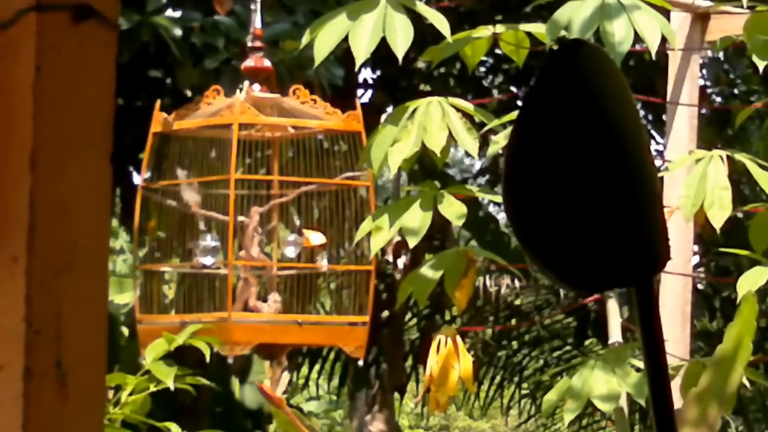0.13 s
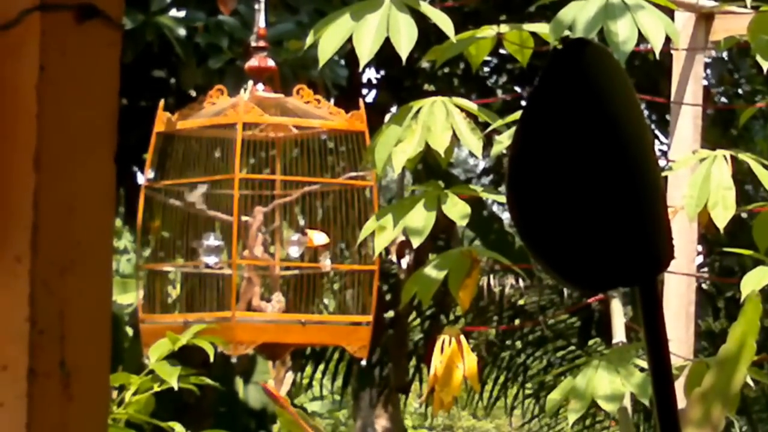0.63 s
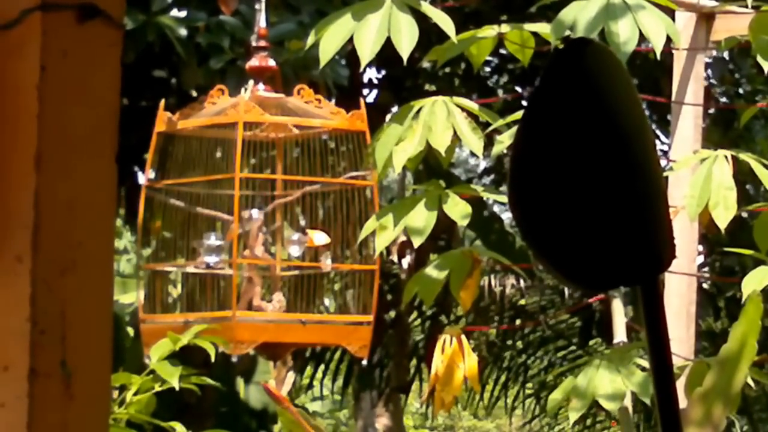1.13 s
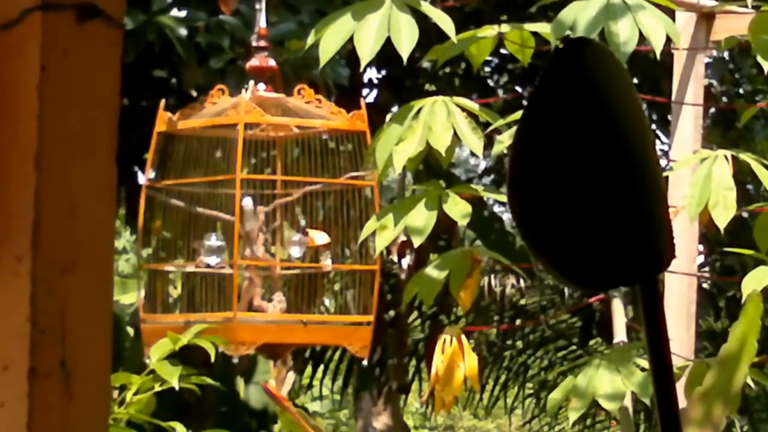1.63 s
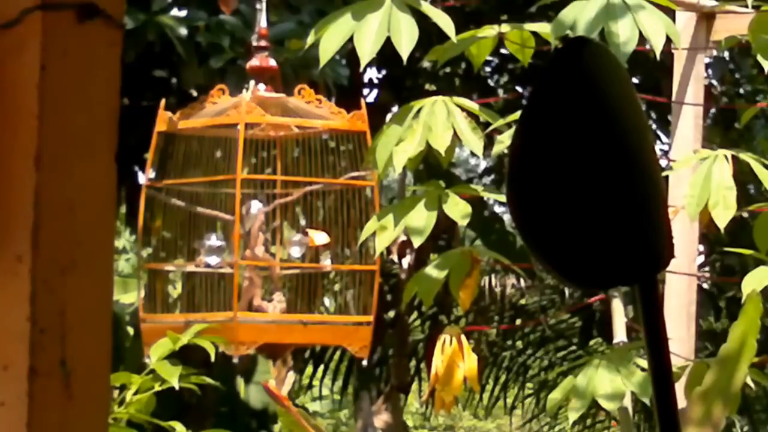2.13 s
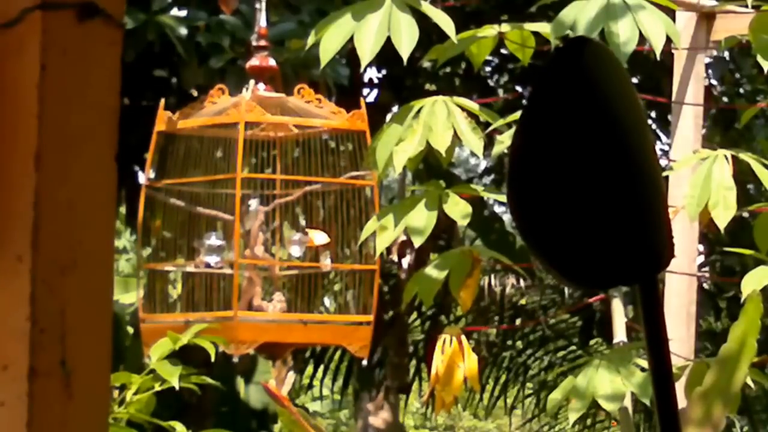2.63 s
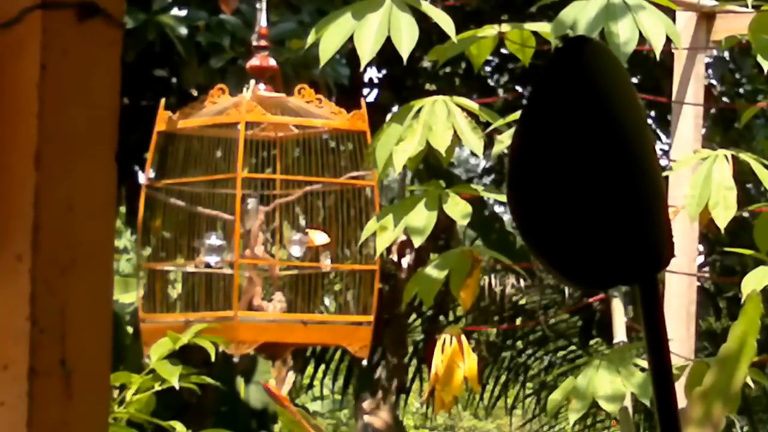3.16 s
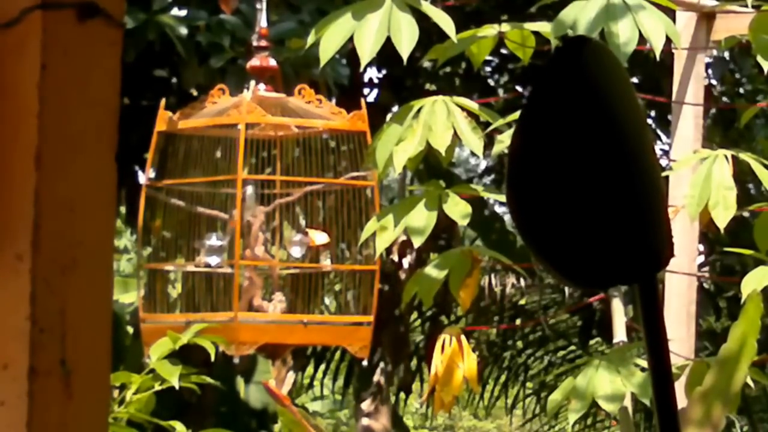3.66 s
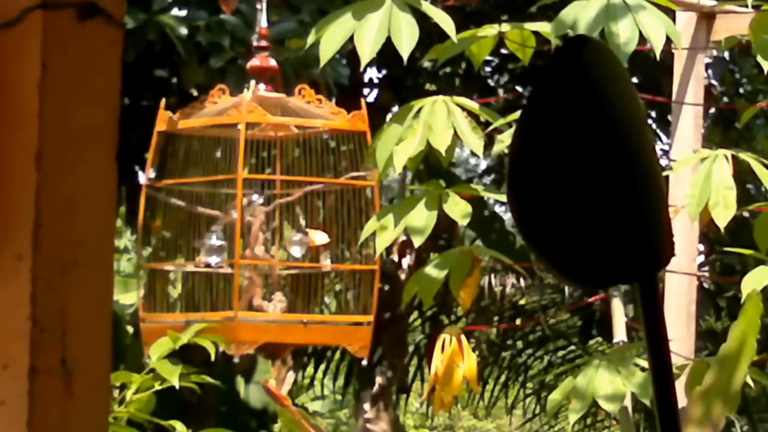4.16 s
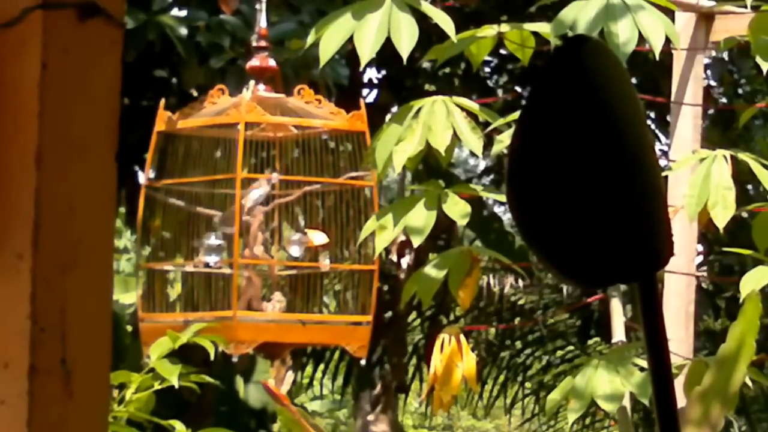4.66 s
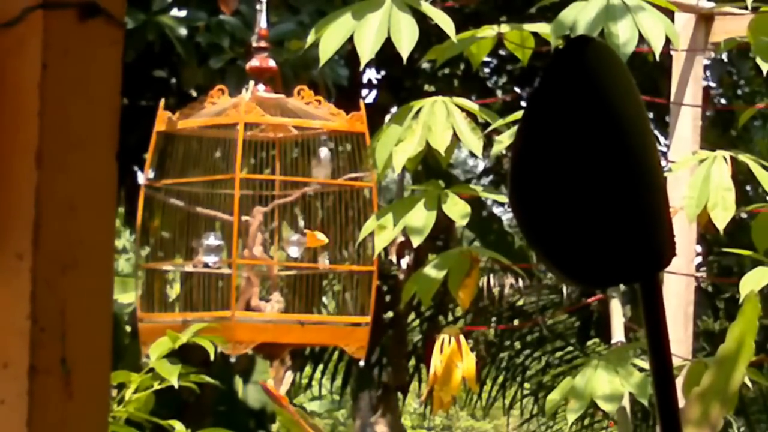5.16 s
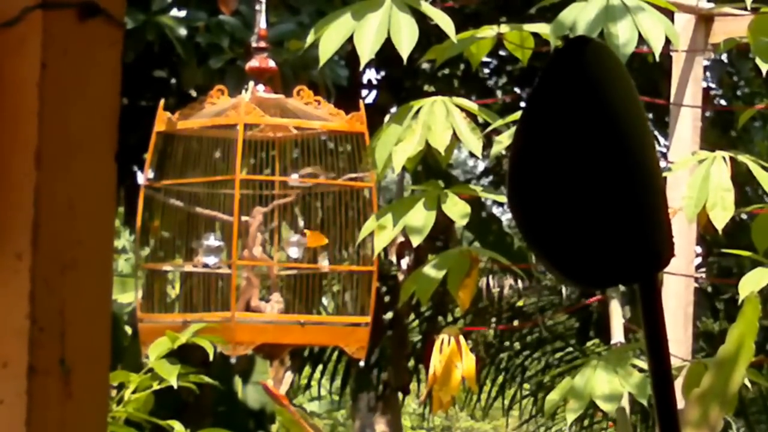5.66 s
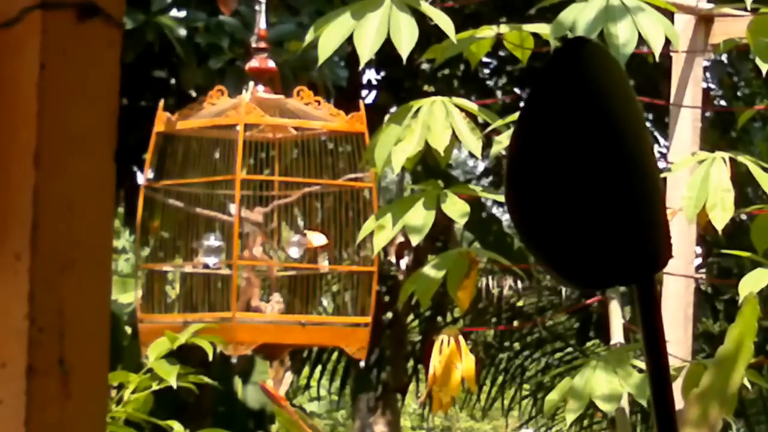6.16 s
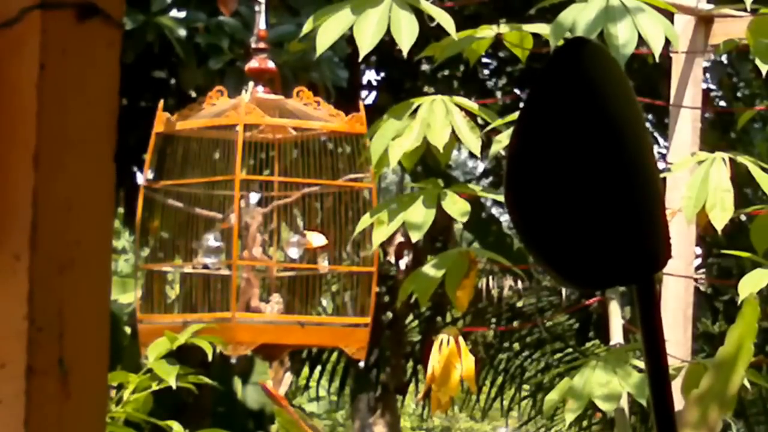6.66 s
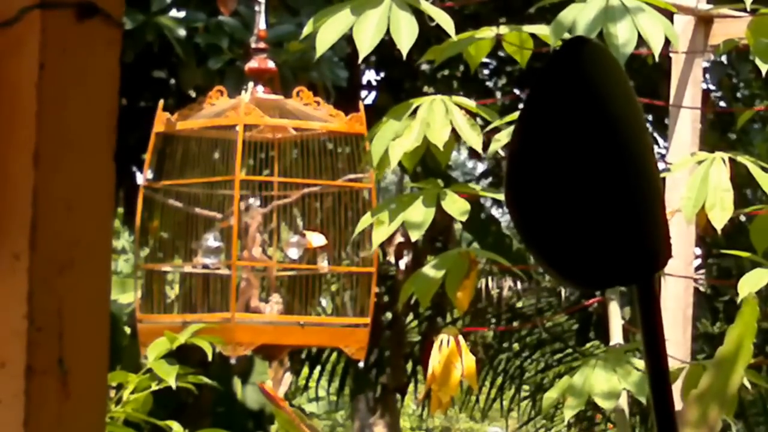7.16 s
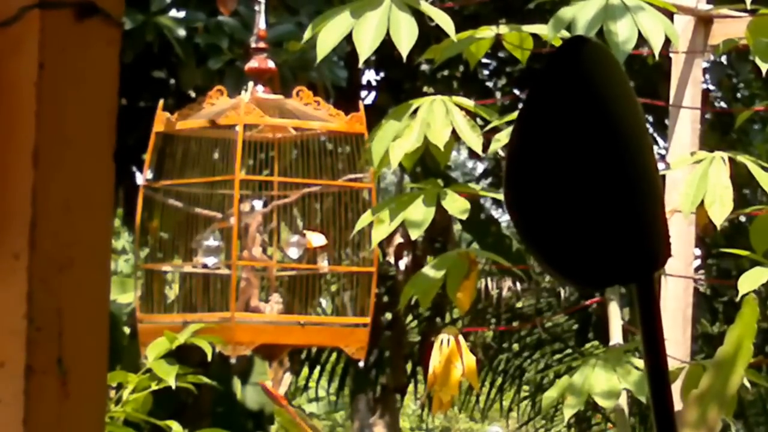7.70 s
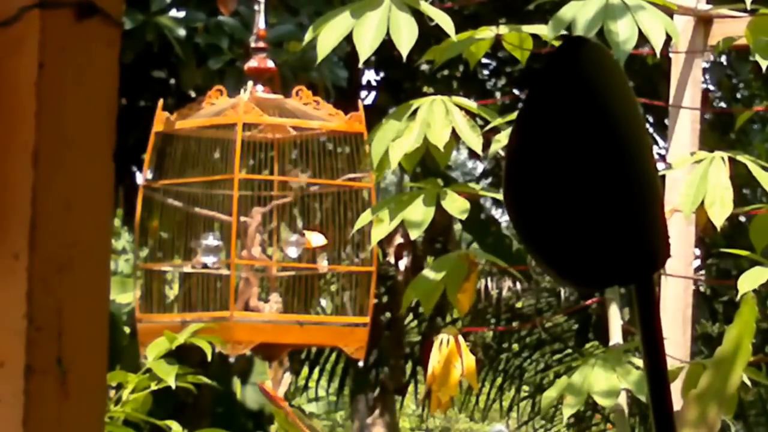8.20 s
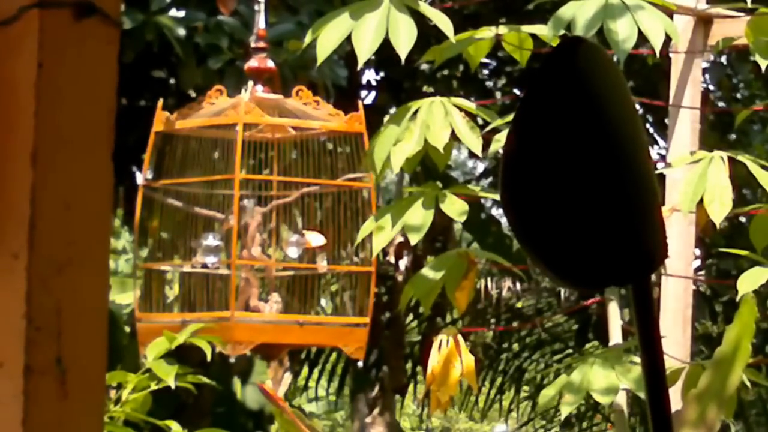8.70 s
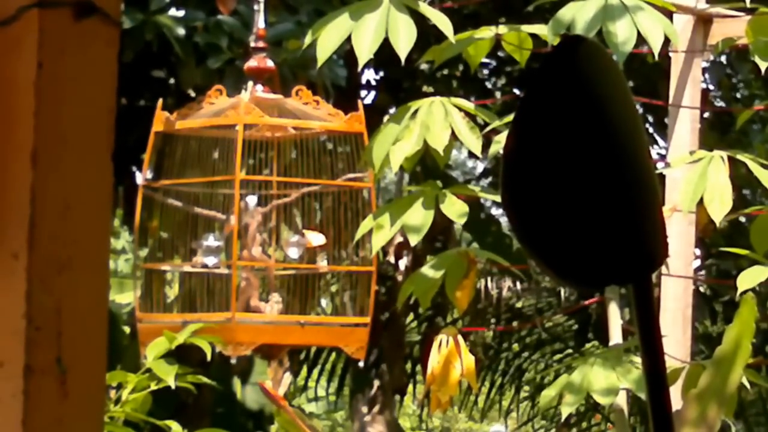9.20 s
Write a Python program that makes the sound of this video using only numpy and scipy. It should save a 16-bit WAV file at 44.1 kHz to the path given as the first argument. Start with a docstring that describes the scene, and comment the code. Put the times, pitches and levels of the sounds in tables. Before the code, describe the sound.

Bright, clicking bird chips open the scene and return five times, each a rapid rise and fall with a brief leafy echo. Quick whistled notes bend and slur between them, while distant birds answer faintly. Behind is a quiet garden bed of low rumble and high insect hiss. A soft double thump with a rustle precedes a far vehicle's tyre rush and engine growl, then calm returns. Mono pickup at moderate distance.

```python
"""Garden songbirds by day

Sharp high chips and short gliding whistles, near and far: sine tones along pitch and level tracks,
smeared by decaying noise echoes off walls and trees. Behind them, filtered noise: low traffic rumble,
tyres and engine of a vehicle passing in the distance, a high band of insect hiss.
A double thump is two pairs of decaying low sines; two brief rustles are gated broad noise."""
import sys
import numpy as np
from scipy import signal
from scipy.fft import rfft, irfft
from scipy.io import wavfile
from scipy.ndimage import uniform_filter1d, map_coordinates

SR = 44100
rng = np.random.default_rng(int(sys.argv[2]) if len(sys.argv) > 2 else 0)


def how_loud(loudness_db):
    """Turn decibels into a plain amplitude multiplier (0 dB gives 1, 20 dB gives 10)."""
    steps = np.asarray(loudness_db, float) / 20
    return 10 ** steps


def dump_mix(stems):
    """Bounce the given channels to the path in sys.argv[1] as a 16-bit WAV at rate SR."""
    frames = np.atleast_2d(stems).T  # one column per channel
    limited = np.clip(frames, -1, 1)  # hard clip at full scale
    pcm = np.round(limited * 32767).astype(np.int16)
    wavfile.write(sys.argv[1], SR, pcm)


N = 411012

# far birds' whistles and lingering echo tails: [t/s, length/s, start f/Hz, end f/Hz, start level/dB]
FAR_GLIDES = [(-.04, 0.069, 2350, 2035, -54), (0.758, 0.0696, 3460, 3607, -60),
              (0.824, 0.16, 2234, 2265, -54.5), (0.865, 0.0646, 2896, 3311, -47.5),
              (0.887, 0.106, 2595, 2610, -54.5), (1.074, 0.0478, 1709, 1878, -50),
              (1.093, 0.0986, 2204, 2385, -41.5), (1.126, 0.0456, 3511, 3101, -33),
              (1.135, 0.0827, 2697, 2781, -40), (1.26, 0.262, 2350, 2335, -53),
              (1.391, 0.0421, 3210, 3188, -47.5), (3.572, 0.0783, 2940, 2539, -48.5),
              (4.066, 0.0397, 2525, 2796, -42), (4.093, 0.1056, 3113, 3060, -50),
              (4.13, 0.018, 1870, 1824, -41), (4.234, 0.0496, 2951, 2835, -48.5),
              (3.878, 0.086, 3400, 3523, -48), (4.263, 0.0812, 2079, 2037, -43.5),
              (4.457, 0.091, 2074, 2076, -42), (4.593, 0.135, 2069, 2033, -52),
              (5.461, 0.0183, 1807, 2050, -46.5), (6.834, 0.082, 2350, 3538, -49.5),
              (7.03, 0.0956, 3279, 2971, -49), (7.164, 0.117, 2053, 2053, -55),
              (7.241, 0.0717, 2769, 2574, -50), (8.273, 0.135, 3421, 3211, -62),
              (8.476, 0.146, 3534, 3129, -60), (8.526, 0.0603, 1410, 1841, -50.5),
              (9.14, 0.127, 3380, 3432, -65.5)]
# pitch and level track of one chip: [t after onset/s, nominal f/Hz, level re chip level/dB]
CHIP_TRACK = [(0, 3547, -33.5), (.009, 7320, -6.5), (0.016, 7500, -11), (0.028, 7642, -3.5),
              (0.046, 7040, -9.5), (0.072, 6365, -12), (0.087, 6275, -49)]
# chip onsets: [t/s, chip level/dB]
CHIP_ONSETS = [(-.021, -6.5), (1.111, -7), (2.966, -7), (4.585, -7.5), (6.776, -7.5), (9.063, -7.5)]
# broad hiss in near notes and at chip onsets: [f/Hz, relative level/dB]
HISS_SPECTRUM = [(2500, -25), (3800, -17), (8500, -1.5), (11000, -27), (14500, -11.5)]
# echo filter, leaves scatter low notes back less: [f/Hz, gain/dB]
FOLIAGE_FILTER = [(1800, -2.5), (3000, 0)]
# low traffic rumble: [f/Hz, relative level/dB]
RUMBLE_SPECTRUM = [(22, 1), (34, 4.5), (105, 4), (135, -13), (330, -14.5), (500, -27.5), (2200, -31),
                   (3500, -67)]
# tyre rush: [f/Hz, relative level/dB]
TYRE_SPECTRUM = [(250, -5.5), (400, -9), (1290, -2), (2000, -11), (4000, -21), (6000, -23), (11000, -81.5)]
# engine drone: [f/Hz, relative level/dB]
DRONE_SPECTRUM = [(130, -17), (200, -1), (270, 0), (450, -50.5)]
# passing vehicle: [t/s, tyre level/dB, drone level/dB]
TRAFFIC_LEVELS = [(0, -60.5, -52.5), (1.4, -51.5, -55), (1.7, -47.5, -47.5), (3.35, -48.5, -53),
                  (3.55, -42, -45), (4.5, -35.5, -49.5), (4.85, -43, -48.5), (5.6, -38.5, -39),
                  (6.7, -45, -40.5), (7, -48.5, -48.5), (7.8, -51, -43.5), (9.32, -56, -51.5)]
# insects and leaves: [f/Hz, relative level/dB]
INSECT_SPECTRUM = [(4000, -67), (5200, -31), (6300, -18), (7300, 2), (8400, -18.5), (11000, -32),
                   (11800, -72.5), (13200, -49), (14000, -15.5), (15600, -26)]
# near bird's bent notes, before tone filter: [t/s, length/s, start f/Hz, bend f/Hz, end f/Hz, peak level/dB]
BENT_NOTES = [(1.525, 0.094, 1583, 2464, 1915, -36.5), (2.107, 0.078, 1604, 2694, 2892, -29),
              (2.323, 0.0533, 1900, 2444, 2186, -33), (2.78, 0.0477, 2350, 2464, 2462, -31.5),
              (2.94, 0.066, 1518, 2835, 3706, -26), (5.209, 0.0648, 2200, 3136, 3242, -29.5),
              (5.485, .11, 3200, 2543, 2941, -28), (2.704, 0.0445, 3300, 3620, 2980, -28),
              (5.902, 0.0455, 2900, 2924, 2956, -28), (7.35, 0.1, 1495, 2381, 1826, -37.5)]
# near bird's wide upward flicks, before tone filter: [t/s, length/s, start f/Hz, end f/Hz, peak level/dB]
UPWARD_FLICKS = [(1.834, .085, 2160, 4286, -34), (3.852, 0.085, 2830, 4638, -47.5)]
# near bird's one-way slurs, before tone filter: [t/s, length/s, start f/Hz, end f/Hz, peak level/dB]
ONE_WAY_SLURS = [(2.072, 0.0137, 2620, 1864, -38), (2.231, 0.0547, 1433, 2070, -37.5),
                 (2.276, 0.0334, 2392, 3048, -34), (2.71, 0.0317, 2976, 2579, -30),
                 (2.762, 0.023, 1947, 2186, -25.5), (4.413, 0.0387, 2837, 2304, -28.5),
                 (5.597, 0.1373, 2875, 3510, -24.5), (5.644, 0.0262, 3386, 3735, -30),
                 (5.671, 0.0574, 2356, 2009, -34), (5.915, 0.0091, 3772, 3527, -34.5),
                 (5.939, 0.075, 1865, 2700, -32.5), (6.006, 0.0278, 3556, 3772, -29),
                 (6.012, 0.061, 2975, 3648, -24), (6.083, 0.068, 2613, 2417, -29.5),
                 (7.447, 0.0148, 1946, 2890, -37)]
# tone filter for near notes, passes about 3 kHz and a band near 10.5 kHz: [f/Hz, gain/dB]
NEAR_TONE_FILTER = [(2700, -2), (3450, 0), (4500, -12.5), (8500, -20), (10500, 2), (12500, -10.5),
                    (14000, -15)]
# thumps: [t/s, level/dB]
THUMP_HITS = [(3.492, -24), (3.52, -18.5)]
# rustles: [t/s, length/s, level/dB]
RUSTLE_BURSTS = [(3.505, 0.22, -52), (8.735, 0.167, -51.5)]
# engine under load: [f/Hz, relative level/dB]
GROWL_SPECTRUM = [(400, -17), (520, 0), (620, -25), (730, 0.5), (880, -16), (1050, -6), (1400, -43.5)]
# engine pulls harder, then lets go: [t/s, level/dB]
LOAD_LEVELS = [(5.1, -64), (5.5, -49), (6.65, -41.5), (6.88, -65.5)]

# swell of a near note: (peak time as share of length, start level re peak/dB, end level re peak/dB)
RISING, FALLING = (0.79, -10.5, -3), (0.2, -1.8, -1)
BENT, FLICKED = (0.38, -6.5, -0.44), (0.41, -4, -7.5)
RISE_SHARE_AT_PEAK = 0.72  # part of a rising slur's glide covered at its peak
SLUR_ECHO_DB, FLICK_ECHO_DB, BENT_ECHO_DB = 5.5, 9.5, 3  # close echoes re direct note, before foliage
STEP_RATE_HZ, STEP_FLATNESS = 70, 0.9  # near glides move in steps; flatness 0-1


def unit(x):
    """Scales to rms 1."""
    return x / np.sqrt(np.mean(x ** 2) + 1e-20)


def coloured(x, spectrum):
    """Filters x by (f/Hz, gain/dB) points joined along log frequency."""
    f_hz, gain_db = np.transpose(spectrum)
    bins_hz = np.fft.rfftfreq(len(x), 1 / SR)
    gain = how_loud(np.interp(np.log(bins_hz + 1), np.log(f_hz + 1), gain_db))
    return irfft(rfft(x) * gain, len(x))


def add(track, sound, t_s):
    """Mixes a sound into the track at t_s, trimmed to fit."""
    i = round(t_s * SR)
    sound = sound[max(-i, 0):][:len(track) - max(i, 0)]
    track[max(i, 0):][:len(sound)] += sound


def wobble(size, rate_hz):
    """Smooth random curve, rate_hz knots a second."""
    knots = rng.standard_normal(int(size * rate_hz / SR) + 4)
    return map_coordinates(knots, [np.arange(size) * rate_hz / SR])


def rush(spectrum, patchy_db, size=N):
    """Coloured noise of rms 1; gain varies in random time-frequency patches."""
    z = signal.stft(rng.standard_normal(size + 2048), nperseg=512)[2]
    patches = uniform_filter1d(rng.standard_normal(z.shape), size=6, axis=0)
    patches = uniform_filter1d(patches, size=14, axis=1)
    x = signal.istft(z * how_loud(patchy_db * unit(patches)), nperseg=512)[1]
    return unit(coloured(x, spectrum)[:size])


def whistle(track, overtones_db, warble, flutter_db, edge_s, stepped=0):
    """Gliding syrinx tone, overtones, unsteady pitch and strength, soft ends; also its envelope."""
    t_s, f_hz, level_db = np.transpose(sorted(track))
    t = np.arange(t_s[0], t_s[-1] + edge_s, 1 / SR)
    step_w = 2 * np.pi * STEP_RATE_HZ
    glide_hz = np.interp(t + stepped * np.sin(step_w * t) / step_w, t_s, f_hz)
    # high notes are strained and waver more; warble is the share at 3 kHz
    strain = (np.minimum(glide_hz, 3700) / 3000) ** 4
    pitch_hz = glide_hz * (1 + warble * strain * wobble(len(t), rate_hz=330))
    phase = 2 * np.pi * np.cumsum(pitch_hz) / SR
    tone = np.sin(phase)
    for harmonic, db in enumerate(overtones_db, start=2):
        tone = tone + how_loud(db) * np.sin(harmonic * phase)
    ends = np.clip(np.minimum(t - t[0], t[-1] - t) / edge_s, 0, 1)
    flutter = flutter_db * wobble(len(t), rate_hz=128.4)
    envelope = ends * how_loud(np.interp(t, t_s, level_db) + flutter)
    return np.sqrt(2) * tone * envelope, envelope


def scatter(x, level_db, t60_s):
    """One fresh decaying noise tail, energy set re x, then thinned by foliage."""
    t = np.arange(SR // 2) / SR
    tail = signal.fftconvolve(x, rng.standard_normal(len(t)) * how_loud(-60 * t / t60_s))
    share = np.linalg.norm(x) / np.linalg.norm(tail)
    return how_loud(level_db) * share * coloured(tail, FOLIAGE_FILTER)


def echoes(x, wet_db, t60_s, far_db, far_t60_s):
    """Direct sound plus close echoes and a weaker, longer scatter from far trees."""
    direct = np.pad(x, (0, SR // 2 - 1))
    return direct + scatter(x, wet_db, t60_s) + scatter(x, far_db, far_t60_s)


def far_glides():
    """Far birds' whistles and lingering echo tails: gliding tones, no overtones, mostly echo."""
    out = np.zeros(N)
    for t_s, length_s, from_hz, to_hz, level_db in FAR_GLIDES:
        track = [(0, from_hz, level_db), (length_s, to_hz, level_db - 1.5)]  # fades along its length
        call, _ = whistle(track, [], warble=0.02997, flutter_db=5, edge_s=0.005)
        add(out, echoes(call, wet_db=6.5, t60_s=0.461, far_db=0.5, far_t60_s=0.82), t_s)
    return out


def chips():
    """One rising then falling chip, pitch varied each time; a short dry burst of broad noise opens it."""
    out, t = np.zeros(N), np.arange(SR // 20) / SR
    for t_s, chip_db in CHIP_ONSETS:
        bend = 1 + 0.0068 * rng.standard_normal()
        track = [(u, f_hz * bend, db + chip_db) for u, f_hz, db in CHIP_TRACK]
        call, _ = whistle(track, [-33], warble=0.00064, flutter_db=2.0, edge_s=0.00072)
        add(out, echoes(call, wet_db=2.0, t60_s=0.1487, far_db=-6, far_t60_s=0.297), t_s)
        swell = np.sin(np.pi * np.clip(t / 0.0283, 0, 1))
        burst = swell * rush(HISS_SPECTRUM, patchy_db=8.0, size=len(t))
        add(out, how_loud(chip_db - 19.0) * burst, t_s)
    return out


def rumble():
    """Low traffic noise, level drifting slowly."""
    level_db = -39.5 + 0.5 * wobble(N, rate_hz=3.037)
    return how_loud(level_db) * rush(RUMBLE_SPECTRUM, patchy_db=2.0)


def vehicle():
    """Tyre rush and engine drone of a distant pass: noise bands on separate level tracks."""
    t_s, tyre_db, drone_db = np.transpose(TRAFFIC_LEVELS)
    t = np.arange(N) / SR
    tyres = how_loud(np.interp(t, t_s, tyre_db)) * rush(TYRE_SPECTRUM, patchy_db=1.5)
    drone = how_loud(np.interp(t, t_s, drone_db)) * rush(DRONE_SPECTRUM, patchy_db=1.5)
    return tyres + drone


def insects():
    """Steady high-band hiss."""
    return how_loud(-51.5) * rush(INSECT_SPECTRUM, patchy_db=1.5)


def swelling_track(length_s, from_hz, peak_hz, to_hz, peak_db, swell):
    """Start, peak and end of a note as (t/s, f/Hz, level/dB)."""
    share, start_db, end_db = swell
    start = (0, from_hz, peak_db + start_db)
    peak = (share * length_s, peak_hz, peak_db)
    return [start, peak, (length_s, to_hz, peak_db + end_db)]


def near_notes():
    """Bent notes peak at the bend, flicks thin out upward, rising slurs swell late, falling ones early."""
    for t_s, length_s, from_hz, bend_hz, to_hz, db in BENT_NOTES:
        yield t_s, swelling_track(length_s, from_hz, bend_hz, to_hz, db, BENT), BENT_ECHO_DB
    for t_s, length_s, from_hz, to_hz, db in UPWARD_FLICKS:
        peak_hz = from_hz + FLICKED[0] * (to_hz - from_hz)
        yield t_s, swelling_track(length_s, from_hz, peak_hz, to_hz, db, FLICKED), FLICK_ECHO_DB
    for t_s, length_s, from_hz, to_hz, db in ONE_WAY_SLURS:
        swell, covered = (RISING, RISE_SHARE_AT_PEAK) if to_hz > from_hz else (FALLING, FALLING[0])
        peak_hz = from_hz + covered * (to_hz - from_hz)
        yield t_s, swelling_track(length_s, from_hz, peak_hz, to_hz, db, swell), SLUR_ECHO_DB


def near_song():
    """Syrinx tone with overtones and breath hiss, tone-filtered, then echoed."""
    out = np.zeros(N)
    for t_s, track, echo_db in near_notes():
        tone, envelope = whistle(track, [-25.5, -44.0, -33, -24.0], warble=0.0379, flutter_db=4.0,
                                 edge_s=0.0012, stepped=STEP_FLATNESS)
        # breath swells less than the tone
        breath = envelope ** 0.251 * rush(HISS_SPECTRUM, patchy_db=-0.5, size=len(tone))
        call = coloured(tone + how_loud(-40.0) * breath, NEAR_TONE_FILTER)
        add(out, echoes(call, wet_db=echo_db, t60_s=0.2163, far_db=echo_db - 6, far_t60_s=0.467), t_s)
    return out


def thumps():
    """Dull double thump: each hit a short low sine plus a longer low ring."""
    out, t = np.zeros(N), np.arange(SR // 2) / SR
    thud = np.sin(2 * np.pi * 66 * t) * how_loud(-60 * t / 0.106)
    ring = 0.88 * np.sin(2 * np.pi * 58 * t) * how_loud(-60 * t / 0.5)
    for t_s, level_db in THUMP_HITS:
        add(out, -how_loud(level_db) * (thud + ring), t_s)
    return out


def rustles():
    """Brief broad leaf noise: fast attack, hold, linear fade."""
    out, t = np.zeros(N), np.arange(SR // 2) / SR
    leaves = rush([(800, -38.5), (2000, 6.5), (6000, 0), (12000, -23.5)], patchy_db=2)
    for t_s, length_s, level_db in RUSTLE_BURSTS:
        swell = np.clip(t / 0.0036, 0, 1) * np.clip(2 - 2 * t / length_s, 0, 1)
        add(out, how_loud(level_db) * swell * leaves[round(t_s * SR):][:len(t)], t_s)
    return out


def growl():
    """Engine under load: noise in low bands on the load track."""
    level_db = np.interp(np.arange(N) / SR, *np.transpose(LOAD_LEVELS))
    return how_loud(level_db) * rush(GROWL_SPECTRUM, patchy_db=1.0)


def scene():
    """All sources on one channel."""
    birds = far_glides() + chips() + near_song()
    background = rumble() + vehicle() + insects() + growl()
    return (birds + background + thumps() + rustles())[None]


def low_pass(x):
    """Removes everything above the highest recorded frequency."""
    return signal.sosfilt(signal.butter(12, 15730, fs=SR, output="sos"), x)


def record(dry):
    """Input stage overloads on the loudest chips: smooth saturation towards a ceiling."""
    ceiling = 0.74
    limited = dry / (1 + np.abs(dry / ceiling) ** 8) ** (1 / 8)
    return low_pass(limited)


dry = scene()
out = record(dry)
dump_mix(out)
```